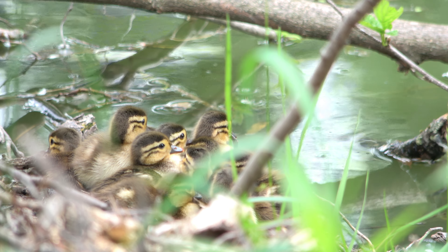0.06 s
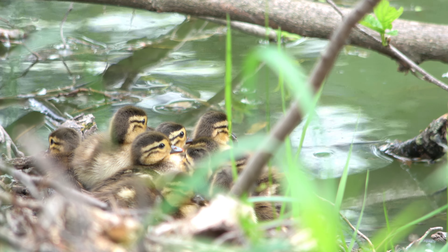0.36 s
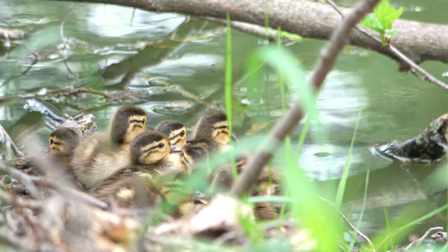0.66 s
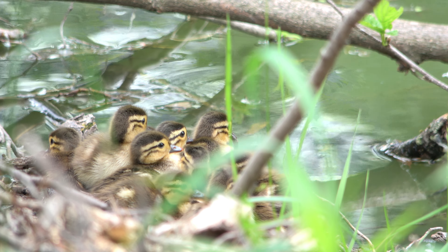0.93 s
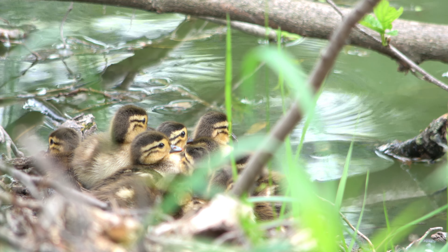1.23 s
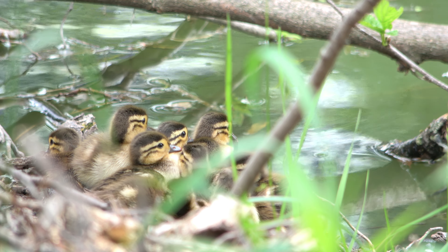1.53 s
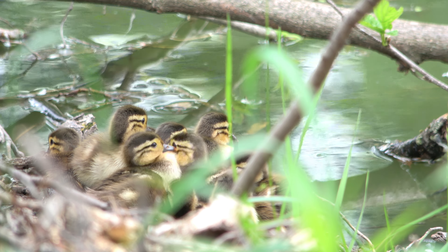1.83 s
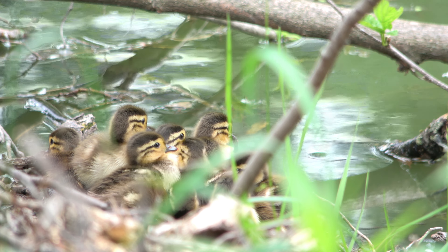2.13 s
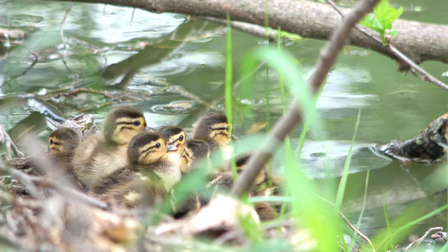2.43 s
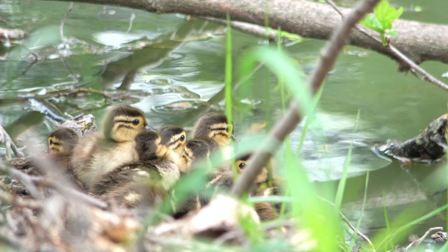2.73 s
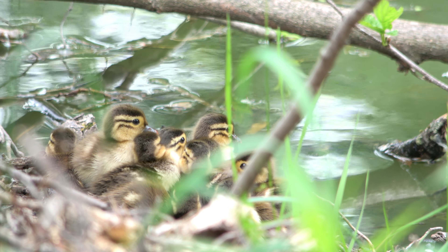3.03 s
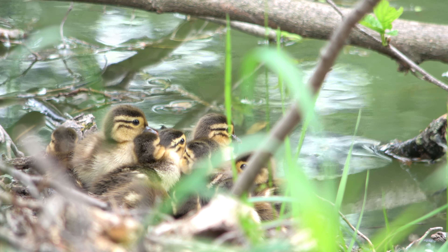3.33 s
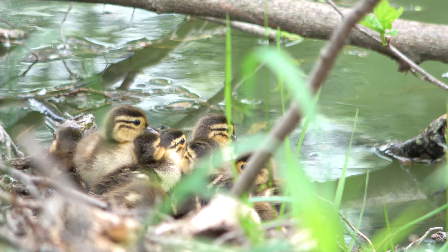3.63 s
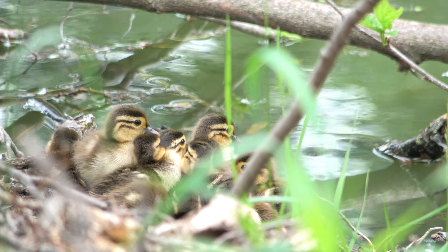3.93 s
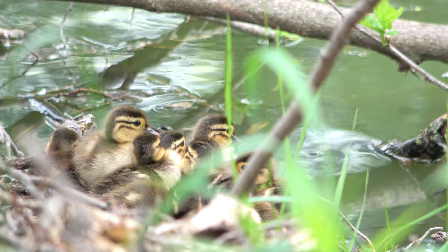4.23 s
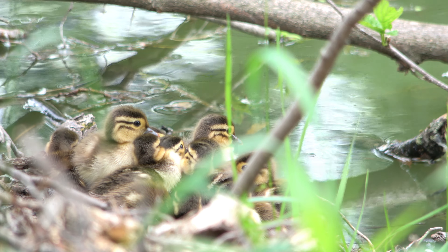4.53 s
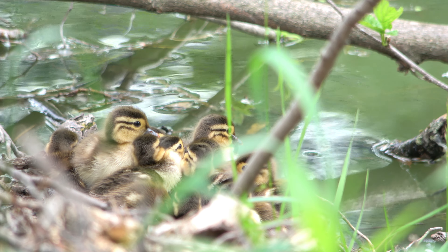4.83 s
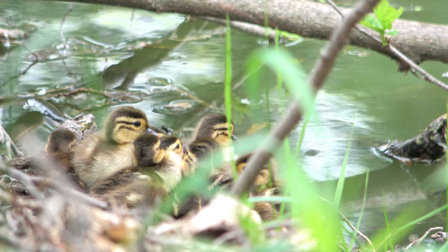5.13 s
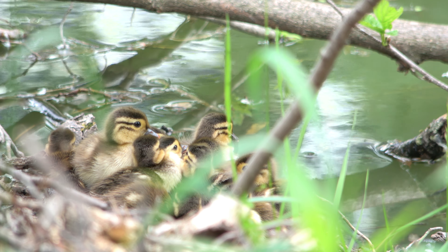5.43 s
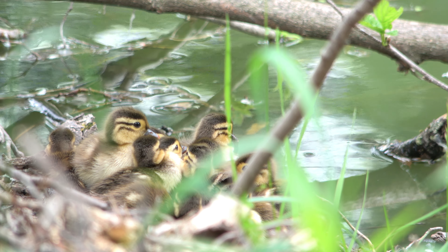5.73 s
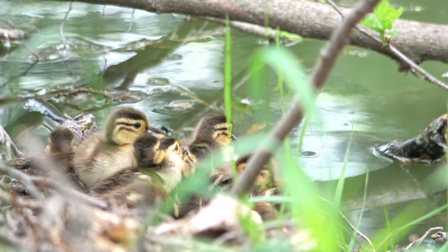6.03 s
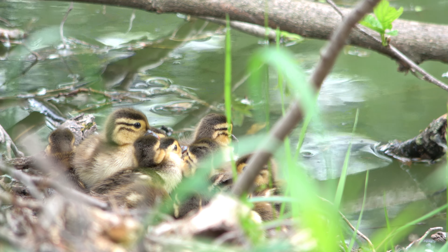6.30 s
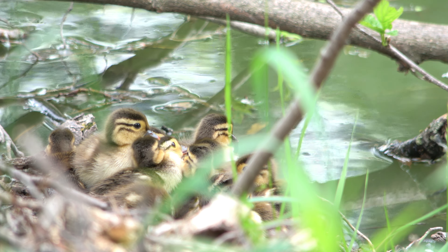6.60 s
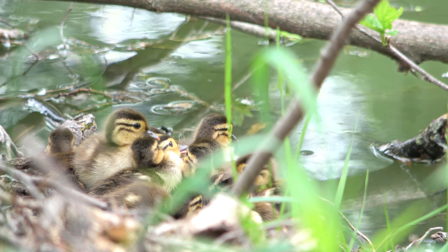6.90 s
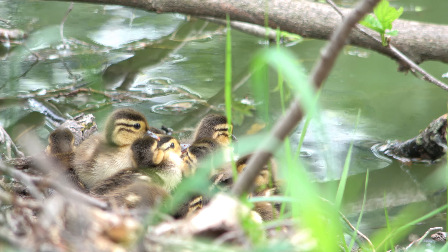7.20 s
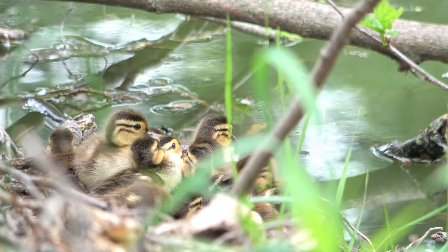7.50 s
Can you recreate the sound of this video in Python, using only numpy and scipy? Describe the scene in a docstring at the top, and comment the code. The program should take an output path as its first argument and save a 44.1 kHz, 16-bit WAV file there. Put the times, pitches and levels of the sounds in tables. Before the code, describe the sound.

Steady light rain on water and bushes, with a few heavy drops close by, thin bird chirps and soft wind rumble.

```python
"""Light rain on a pond among bushes: far drops merge into a wash, near ones patter on leaves and water.
A breeze rumbles on the microphone over a distant drone and dies down after five seconds.
Small birds buzz, cheep and peep thinly from the branches, one whistles further off,
and one gives two arched chips that echo off the bank. Nearly everything sits in the centre."""
import sys
import numpy as np
from scipy import signal
from scipy.fft import rfft, irfft
from scipy.io import wavfile

SR = 44100
rng = np.random.default_rng(int(sys.argv[2]) if len(sys.argv) > 2 else 0)


def generate_wav(sig):
    """Save sig (samples, or channels by samples) to the path in sys.argv[1] as 16-bit PCM at SR."""
    pcm = np.round(np.clip(np.atleast_2d(sig).T, -1, 1) * 32767).astype(np.int16)
    wavfile.write(sys.argv[1], SR, pcm)


N = 333396
T = np.arange(N) / SR

# spectrum of the far rain: frequency_hz, relative_db
FAR_RAIN_SPECTRUM = [(150, -36), (250, -11.5), (372, -8.5), (603, -0.5), (929, 1.5), (1730, -1.5),
                     (2490, -6), (3450, -6.5), (4870, -9.5), (7770, -13.5), (10200, -31), (12800, -31.5),
                     (15500, -51)]
# tone of the patter among the leaves: frequency_hz, relative_db
LEAF_SPECTRUM = [(300, -29), (1200, 4.5), (3000, 16), (6500, 9.5), (8000, -14), (10000, -5), (15000, -22)]
# gusts at the microphone: time_s, level_db
GUSTS = [(0, -40.5), (.3, -37.5), (.7, -32.5), (1.1, -37.5), (1.35, -35.5), (1.95, -34.5), (2.38, -39.5),
         (2.75, -36), (2.97, -45.5), (3.55, -33), (3.92, -39), (4.2, -38.5), (4.65, -40), (5.0, -44),
         (5.78, -48), (6.0, -43.5), (7.56, -50)]
# their rumble: frequency_hz, relative_db
RUMBLE_SPECTRUM = [(5, 1), (12, 7), (22, 3), (32, -3.5), (60, -5.5), (100, -11), (160, -16.5), (230, -22.5),
                   (400, -38), (900, -70)]
# distant drone of the surroundings: frequency_hz, relative_db
DRONE_SPECTRUM = [(30, 2), (70, -14), (150, -3.5), (230, -9), (400, -25), (900, -29.5)]
# long buzzy notes from the branches: start_s, length_s, start_hz, end_hz, level_db, buzz_hz
BUZZ_NOTES = [(-.01, 0.12, 8020, 7690, -50.5, 778), (0.191, 0.098, 8250, 7660, -49, 907),
              (.875, .065, 8100, 7920, -51.5, 765), (1.043, 0.085, 7900, 7800, -53, 718),
              (6.42, .13, 7850, 7730, -57, 727), (6.61, .085, 7800, 7840, -60.5, 750)]
# quick rising cheeps: start_s, length_s, middle_hz, level_db, buzz_hz
CHEEP_NOTES = [(.845, 0.032, 8100, -46.5, 1080), (.973, .033, 7800, -47.5, 1230),
               (1.45, 0.034, 7820, -49, 1310), (1.57, .039, 7950, -48, 1110), (2.3, .065, 7780, -47, 1100),
               (3.209, .03, 7800, -48, 1290), (3.324, 0.03, 7750, -50, 1300),
               (3.504, 0.036, 7660, -46, 1100), (3.846, .03, 7950, -49.5, 1100),
               (3.948, .047, 7630, -41.5, 1080), (4.073, .03, 7620, -49, 1200),
               (4.224, 0.032, 8650, -51, 1090), (4.685, .023, 7720, -49, 1200),
               (5.103, 0.058, 7880, -46, 1090), (5.602, 0.021, 7470, -47, 1910),
               (5.706, 0.029, 7460, -46.5, 1940), (5.835, .036, 7600, -45.5, 1430),
               (6.818, .033, 7870, -46.5, 1400), (6.891, 0.057, 7780, -45.5, 1120),
               (6.955, 0.035, 7660, -48, 1390), (7.293, 0.033, 7700, -49, 1390)]
# pure whistles further off: start_s, length_s, pitch_hz, level_db
WHISTLE_NOTES = [(0, .09, 4400, -52), (.62, .12, 6230, -58), (.715, .06, 6640, -53),
                 (1.446, 0.23, 4570, -53), (1.847, 0.12, 4600, -50), (4.413, 0.08, 6250, -49),
                 (5.39, 0.056, 5490, -51), (7.447, .042, 6770, -49)]
# the same bird's two-note phrases: start_s, level_db
WHISTLE_PHRASES = [(1.223, -46.5), (1.648, -46.5)]
# hiss and rumble that differ between left and right: frequency_hz, relative_db
SIDE_HISS_SPECTRUM = [(3000, -50), (5200, -28), (6300, -43), (7500, 6.5), (12000, 19), (16000, 12)]
SIDE_RUMBLE_SPECTRUM = [(20, -9), (100, -12), (450, -5.5), (750, -50)]
# runs of very high, faint peeps: start_s, end_s, level_db, pitch_hz
HIGH_PEEP_RUNS = [(.117, .34, -61, 12800), (4.328, 4.84, -57, 12600), (4.955, 5.21, -58, 13100),
                  (5.819, 6.9, -62.5, 12750)]
# heavy drops close to the microphone: start_s, level_db, pitch_hz, ring_cycles
HEAVY_DROPS = [(0.5103, -24.5, 2070, 5), (0.95, -23, 2780, 3.1), (1.086, -27, 2160, 3.8),
               (2.2, -23, 5500, 1.2), (2.8535, -22.5, 5200, 2.5), (4.11, -28, 2020, 3.1),
               (4.3553, -23, 2400, 1.9), (5.025, -31, 2740, 5)]
# arched chips: start_s, length_s, top_hz, level_db
CHIP_NOTES = [(0.564, 0.036, 1767, -34), (2.475, .038, 1740, -33.5)]

# the rain eases slowly, its treble a little faster than its body
BODY_EASE_DB_PER_S, TREBLE_EASE_DB_PER_S = 0.1761, 0.22


def undb(db):
    """Decibels to gain."""
    return 10 ** (np.asarray(db) / 20)


def unit(x):
    """Scale to rms 1."""
    return x / np.sqrt(np.mean(x ** 2))


def colour(x, spectrum):
    """Filter by a spectrum of (frequency_hz, relative_db) points; rms 1."""
    hz, db = np.transpose(spectrum)
    bins_hz = np.maximum(np.fft.rfftfreq(N, 1 / SR), 1)
    gain = undb(np.interp(np.log(bins_hz), np.log(hz), db))
    return unit(irfft(rfft(x) * gain, N))


def noise(spectrum):
    """Steady noise with this spectrum; rms 1."""
    return colour(rng.standard_normal(N), spectrum)


def drift(rate_hz):
    """Random drift with spread near 1, turning about rate_hz times a second."""
    return np.interp(T * rate_hz, np.arange(1024), rng.standard_normal(1024))


def add(out, start_s, x):
    """Mix x into out at start_s."""
    start = int(start_s * SR)
    lo, hi = max(start, 0), min(start + len(x), N)
    if hi > lo:
        out[lo:hi] += x[lo - start:hi - start]


def progress(length_s):
    """A ramp u from 0 to 1 over a note."""
    return np.linspace(0, 1, max(int(length_s * SR), 2))


def phase_of(hz):
    """Phase of a moving pitch."""
    return 2 * np.pi * np.cumsum(hz) / SR


def swell(u):
    """A note's soft rise and fall."""
    return np.sqrt(np.abs(np.sin(np.pi * u))) * np.sin(np.pi * u / 2 + np.pi / 4)


def waver(u, share, count=24):
    """Random wobble of a bird's pitch, count times over one note."""
    return 1 + share * np.interp(u, np.linspace(0, 1, count), rng.standard_normal(count))


def bank_echo(x, t60_s, wet_db):
    """Add the diffuse echo of the trunks and the pond's bank."""
    t = np.arange(SR) / SR
    tail = rng.standard_normal(SR) * undb(-60 * t / t60_s) * np.minimum(t / 0.005, 1)
    return x + undb(wet_db) * signal.fftconvolve(x, tail / np.linalg.norm(tail))[:N]


def far_rain(body_db=-41.5, treble_db=-47):
    """Countless far drops merge into a hiss whose low and high parts waver on their own."""
    wash = noise(FAR_RAIN_SPECTRUM)
    low = signal.sosfiltfilt(signal.butter(2, 2800, fs=SR, output="sos"), wash)
    body = unit(low) * undb(body_db - BODY_EASE_DB_PER_S * T + 0.4 * drift(14))
    treble = unit(wash - low) * undb(treble_db - TREBLE_EASE_DB_PER_S * T + 0.5 * drift(25))
    return body + treble


def drop(hz, cycles, splash, grain):
    """One impact: a short splash and a damped ring whose pitch rises as the bubble surfaces."""
    t = np.arange(len(grain)) / SR
    decay = np.exp(-t * hz / cycles)
    ring = np.sin(phase_of(hz * (1 + 0.059 * (1 - decay)))) * decay
    return (1 - splash) * ring + splash * grain * np.exp(-t / 0.0011)


def patter(count=4000, level_db=-48):
    """Nearer drops of all sizes: most tick on leaves, a few ring as bubbles in the pond."""
    out = np.zeros(N)
    draws, grains = rng.random((count, 5)), rng.standard_normal((count, 512))
    for (when, pitch, smallness, ring, splash), grain in zip(draws, grains):
        hz = 1500 * (6500 / 1500) ** pitch
        size_db = -5 * np.log(smallness + 0.05)
        cycles = 0.4 + 3 * ring ** 6
        gain = undb(size_db) / np.sqrt(cycles)  # a longer ring spreads its energy more thinly
        add(out, when * N / SR, gain * drop(hz, cycles, 0.57 * splash, grain))
    return colour(out, LEAF_SPECTRUM) * undb(level_db - TREBLE_EASE_DB_PER_S * T)


def breeze(buffet_db=1.6, buffets_per_s=11):
    """Gusts rumble on the microphone, and the eddies within each gust buffet it."""
    gust_db = np.interp(T, *np.transpose(GUSTS))
    return noise(RUMBLE_SPECTRUM) * undb(gust_db + buffet_db * drift(buffets_per_s))


def far_drone(level_db=-55):
    """The surroundings drone, low and steady, in the distance."""
    return noise(DRONE_SPECTRUM) * undb(level_db)


def syrinx(u, pitch_hz, buzz_hz, depth, rasp):
    """One side of the syrinx whistles, the other chops it into side tones, unevenly when raspy."""
    hz = pitch_hz * waver(u, share=0.0062)
    tone = phase_of(hz * waver(u, share=0.026 * rasp, count=60))
    buzz = phase_of(buzz_hz * hz / hz.mean() * waver(u, share=0.225 * rasp, count=60))
    sides = 0.94 * np.sin(tone - buzz) + 0.29 * np.sin(tone + buzz) + 0.099 * np.sin(tone + 2 * buzz)
    sides += 0.07 * rasp * np.sin(tone + 3 * buzz)
    return swell(u) * (np.sin(tone) + depth * sides)


def branch_birds(forced_s=0.031, easy_sweep_hz=370, forced_sweep_hz=1266):
    """Small birds in the branches: long buzzes that mostly fall and level off, cheeps that sweep up."""
    out = np.zeros(N)
    for start_s, length_s, start_hz, end_hz, level_db, buzz_hz in BUZZ_NOTES:
        u = progress(length_s)
        hz = end_hz + (start_hz - end_hz) * (1 - u) ** 2
        add(out, start_s, undb(level_db) * syrinx(u, hz, buzz_hz, depth=1.9, rasp=0.21))
    for start_s, length_s, middle_hz, level_db, buzz_hz in CHEEP_NOTES:
        u = progress(length_s)
        # a shorter cheep is more forced: it sweeps further, buzzes deeper and turns raspy
        force = min((forced_s / length_s) ** 2, 1)
        sweep_hz = easy_sweep_hz + (forced_sweep_hz - easy_sweep_hz) * force
        hz = middle_hz + sweep_hz * (u - 0.5)
        add(out, start_s, undb(level_db) * syrinx(u, hz, buzz_hz, depth=1.06 * force, rasp=force))
    return bank_echo(out, t60_s=0.23, wet_db=-2.5)


def whistle(length_s, pitch_hz, slide_hz):
    """One pure note that slides through its pitch."""
    u = progress(length_s)
    hz = (pitch_hz + slide_hz * (u - 0.5)) * waver(u, share=0.015)
    return swell(u) * np.sin(phase_of(hz))


def far_whistler(rise_hz=240, slur_after_s=0.063):
    """A far bird sings slightly rising notes and repeats a phrase: a low note, then a falling slur."""
    out = np.zeros(N)
    for start_s, length_s, pitch_hz, level_db in WHISTLE_NOTES:
        add(out, start_s, undb(level_db) * whistle(length_s, pitch_hz, rise_hz))
    for start_s, level_db in WHISTLE_PHRASES:
        low_note = whistle(length_s=0.06, pitch_hz=5470, slide_hz=rise_hz)
        slur = whistle(length_s=0.034, pitch_hz=6300, slide_hz=-410)
        add(out, start_s, undb(level_db) * low_note)
        add(out, start_s + slur_after_s, undb(level_db + 2) * slur)
    return bank_echo(out, t60_s=0.39, wet_db=0)


def stereo_sides(hiss_db=-67.5, rumble_db=-82):
    """A faint top hiss and a trace of rumble, in opposite polarity left and right."""
    side = noise(SIDE_HISS_SPECTRUM) * undb(hiss_db) + noise(SIDE_RUMBLE_SPECTRUM) * undb(rumble_db)
    return np.array([side, -side])


def peeps(period_s=0.06, length_s=0.02, sag_hz=200):
    """Tiny hoarse falling peeps in loose runs that sag in pitch."""
    out, u = np.zeros(N), progress(length_s)
    for start_s, end_s, level_db, pitch_hz in HIGH_PEEP_RUNS:
        beats_s = np.arange(start_s, end_s, period_s)
        for beat_s, (late, sharp, loud) in zip(beats_s, rng.standard_normal((32, 3))):
            along_run = (beat_s - start_s) / (end_s - start_s)
            centre_hz = (pitch_hz + sag_hz * (0.5 - along_run)) * (1 + 0.012 * sharp)
            hz = centre_hz * (1 + 0.055 * (0.5 - u)) * waver(u, share=0.024)
            peep = swell(u) * np.sin(phase_of(hz))
            add(out, beat_s + 0.009 * late, undb(level_db + 1.8 * loud) * peep)
    return bank_echo(out, t60_s=0.35, wet_db=0)


def close_drops(all_splash_cycles=0.6):
    """Heavy drops fall from the branches close by; the less one rings, the more it splashes."""
    out = np.zeros(N)
    for start_s, level_db, pitch_hz, cycles in HEAVY_DROPS:
        splash = min(all_splash_cycles / cycles, 1)
        add(out, start_s, undb(level_db) * drop(pitch_hz, cycles, splash, rng.standard_normal(2048)))
    return signal.sosfilt(signal.butter(4, 8000, fs=SR, output="sos"), out)


def chips(trunk_delay_s=0.02, trunk_db=-11):
    """Quick up-and-down sweeps; a trunk throws back their strong overtones and the trees ring on."""
    low, high = np.zeros(N), np.zeros(N)
    for start_s, length_s, top_hz, level_db in CHIP_NOTES:
        u = progress(length_s)
        arch = 1 - 0.41 * (2 * u - 1) ** 2
        phase = phase_of(top_hz * arch * waver(u, share=0.03, count=36))
        fundamental = undb(level_db - 1.5) * swell(u) ** 0.28 * np.sin(phase)
        overtones = undb(level_db) * swell(u) ** 0.46 * (np.sin(2 * phase) + 0.13 * np.sin(4 * phase))
        add(low, start_s, fundamental)
        add(high, start_s, overtones)
        add(high, start_s + trunk_delay_s, undb(trunk_db) * overtones)
    return bank_echo(low, t60_s=0.34, wet_db=-13) + bank_echo(high, t60_s=0.64, wet_db=-0.5)


def scene():
    """The pond at the microphone: rain, air and birds in the centre, with a trace of width."""
    rain = far_rain() + patter() + close_drops()
    air = breeze() + far_drone()
    birds = branch_birds() + far_whistler() + peeps() + chips()
    return rain + air + birds + stereo_sides()


def record(dry):
    """The recorder cuts the top steeply above 15.8 kHz."""
    return signal.sosfilt(signal.ellip(10, 0.2, 70, 15800, fs=SR, output="sos"), dry)


dry = scene()
out = record(dry)
generate_wav(out)
```